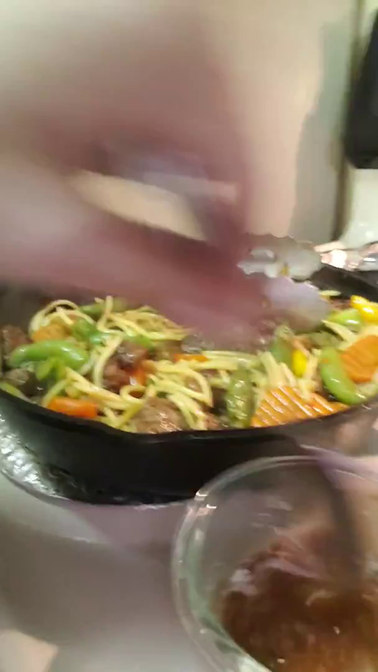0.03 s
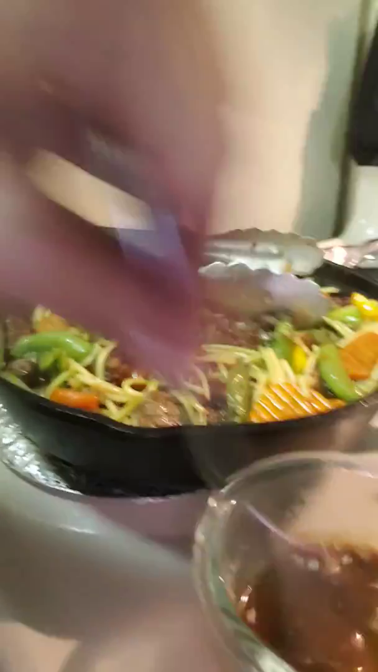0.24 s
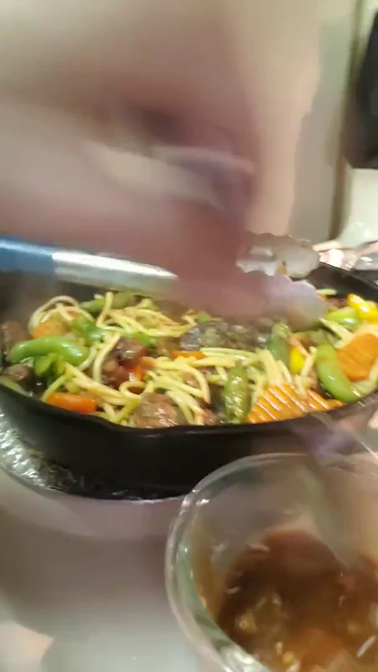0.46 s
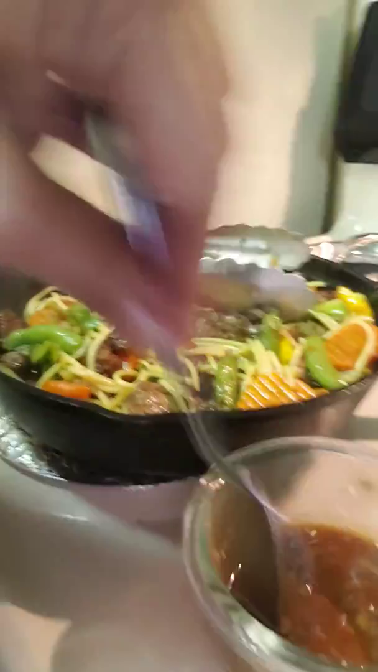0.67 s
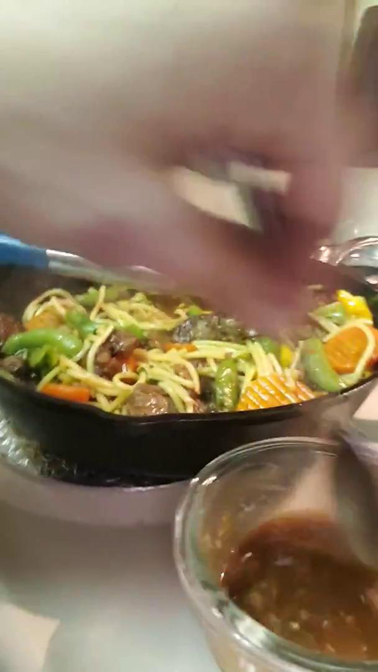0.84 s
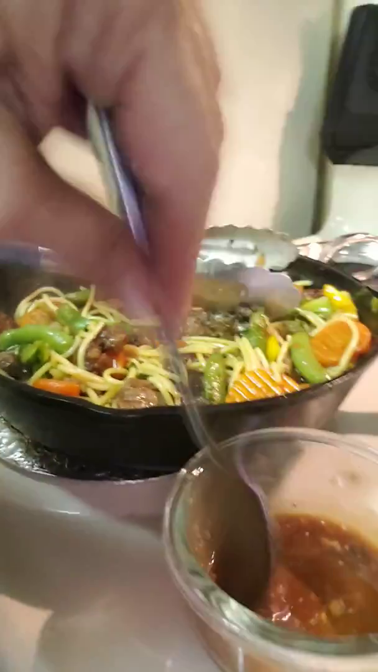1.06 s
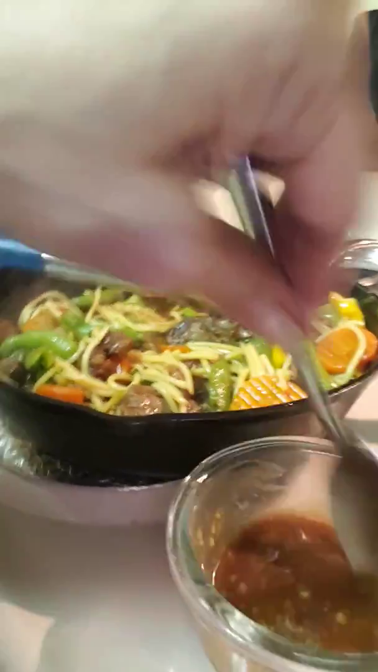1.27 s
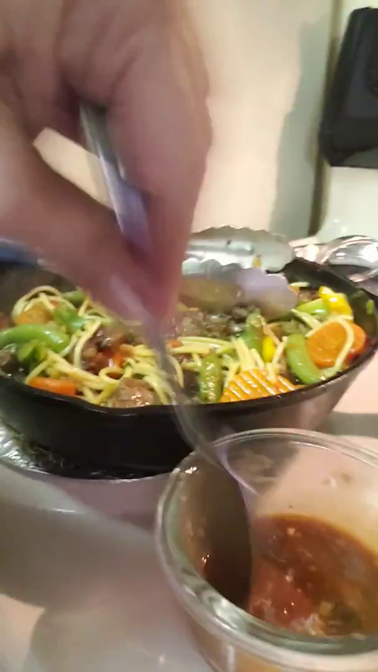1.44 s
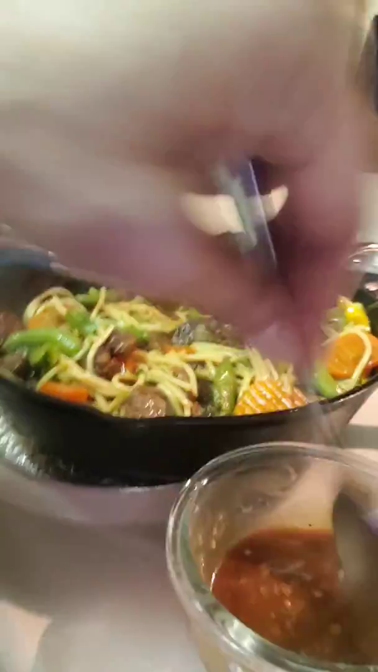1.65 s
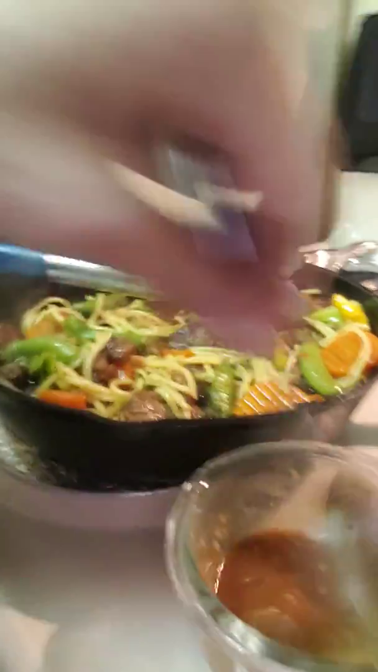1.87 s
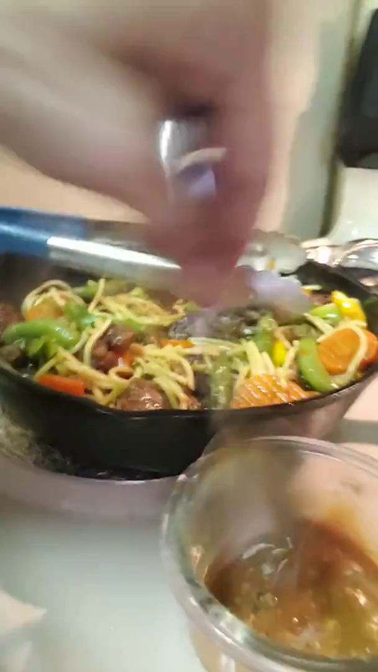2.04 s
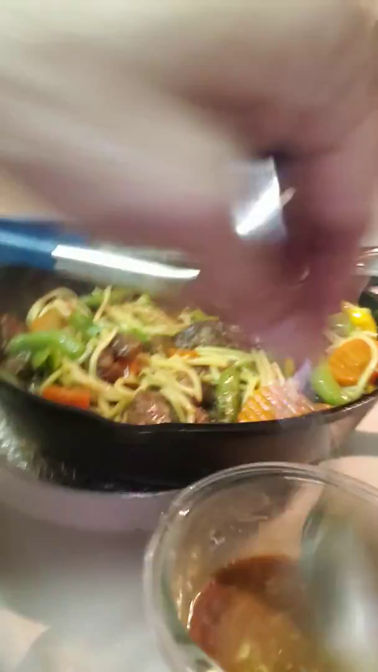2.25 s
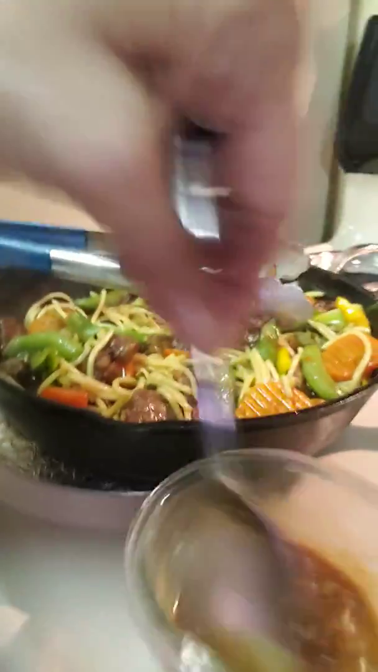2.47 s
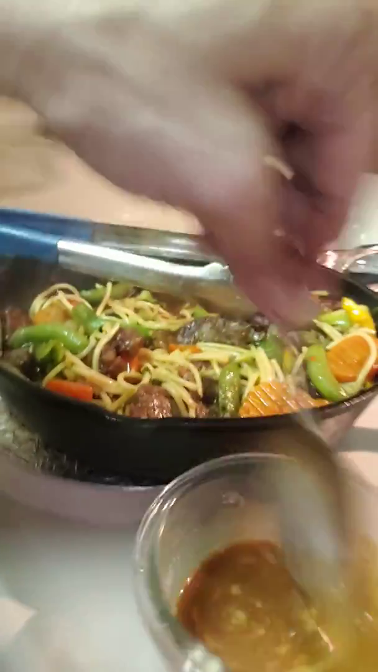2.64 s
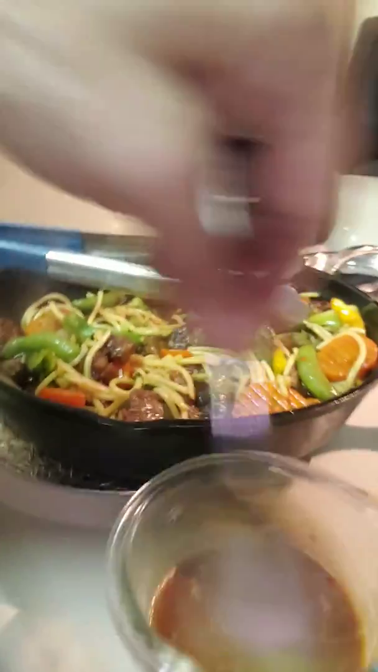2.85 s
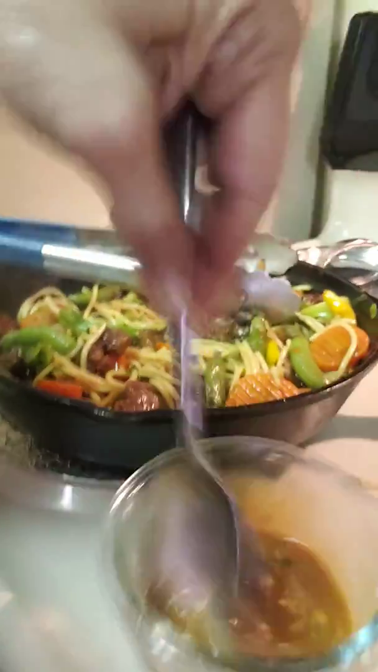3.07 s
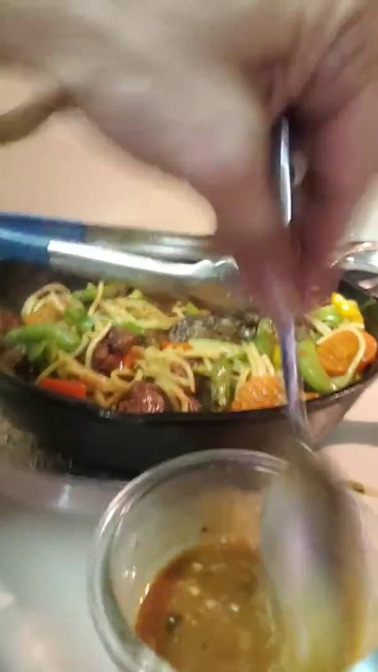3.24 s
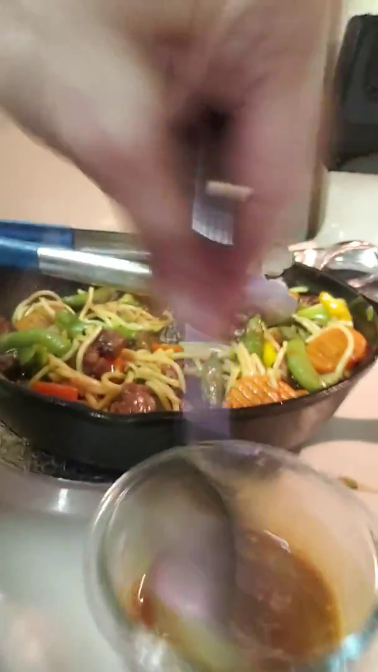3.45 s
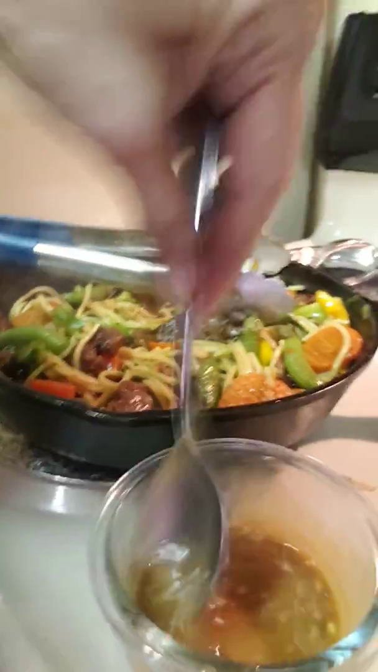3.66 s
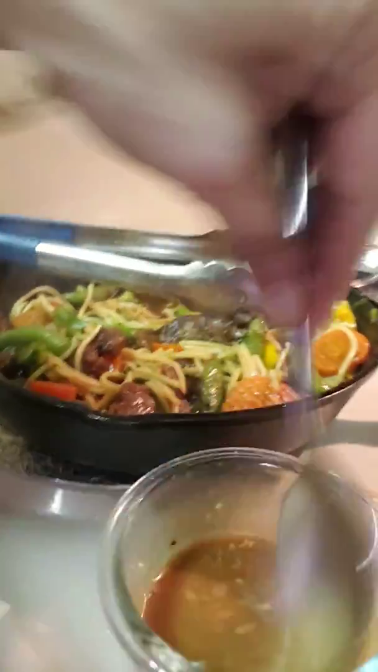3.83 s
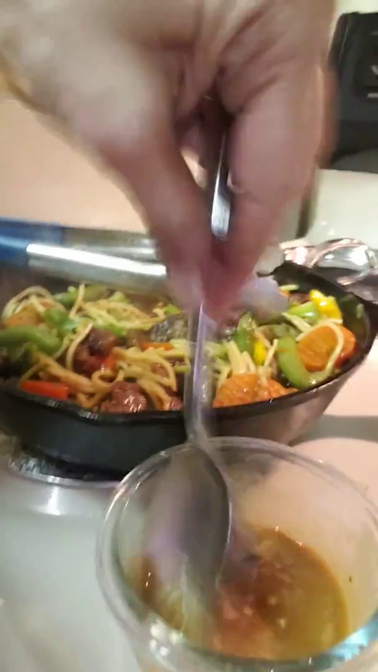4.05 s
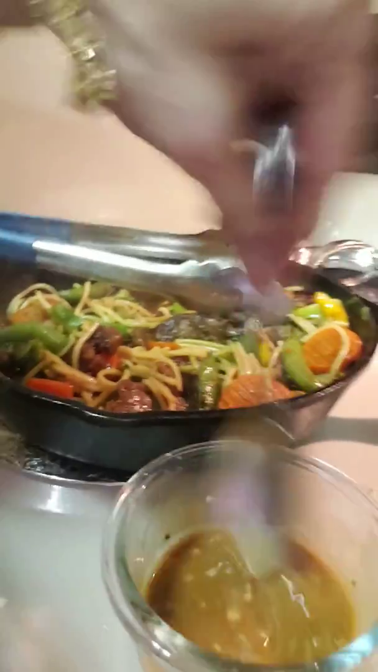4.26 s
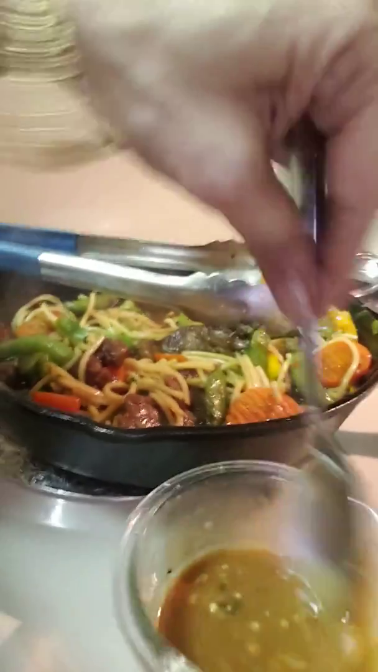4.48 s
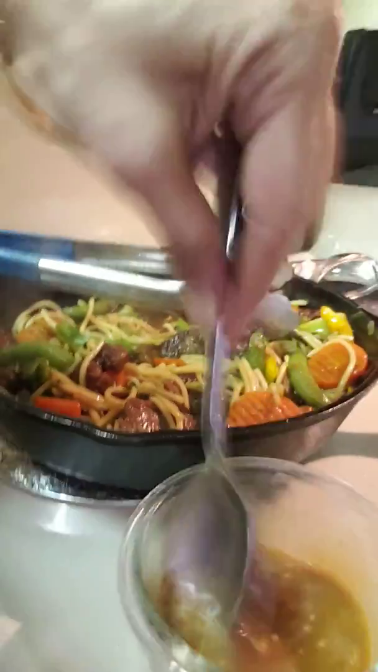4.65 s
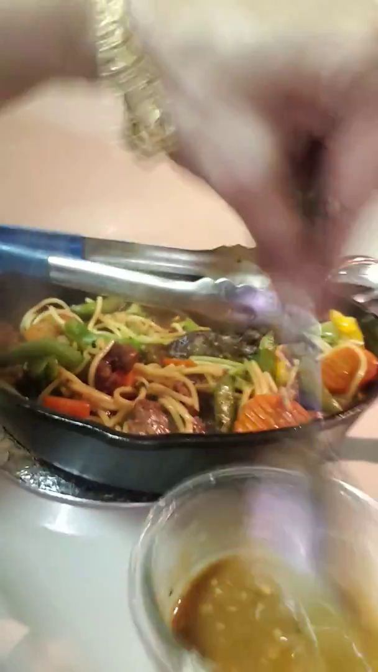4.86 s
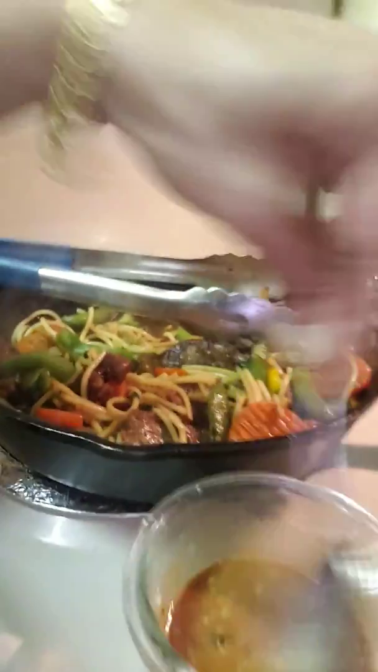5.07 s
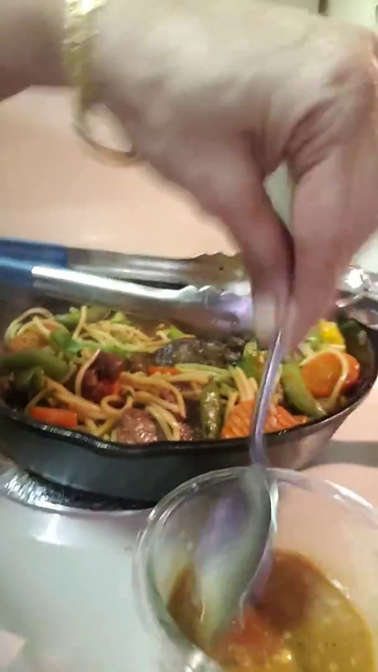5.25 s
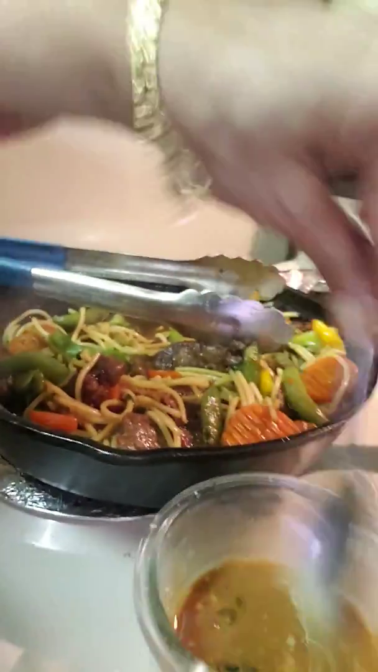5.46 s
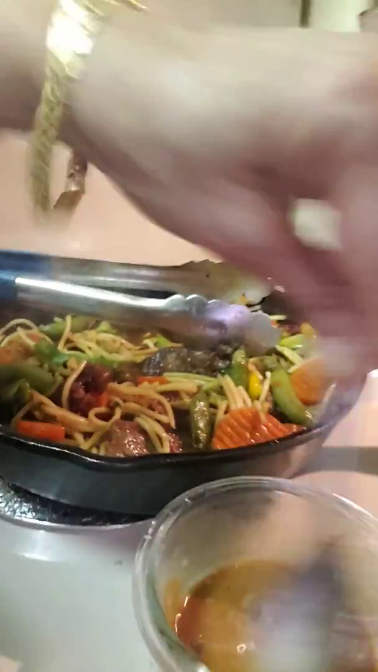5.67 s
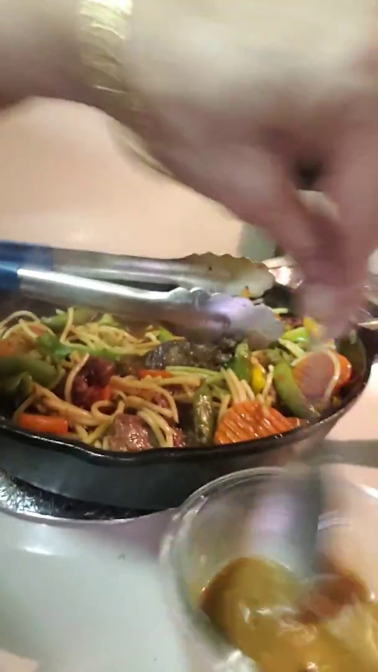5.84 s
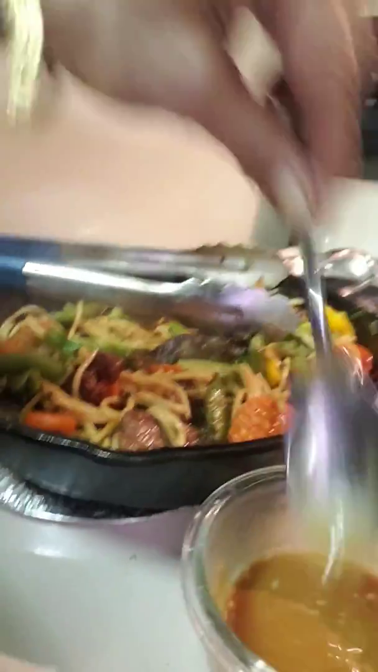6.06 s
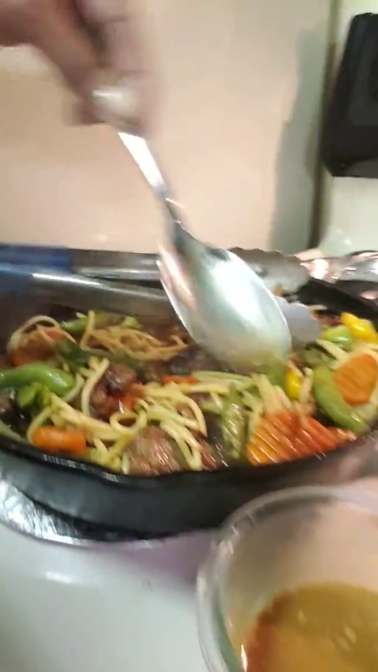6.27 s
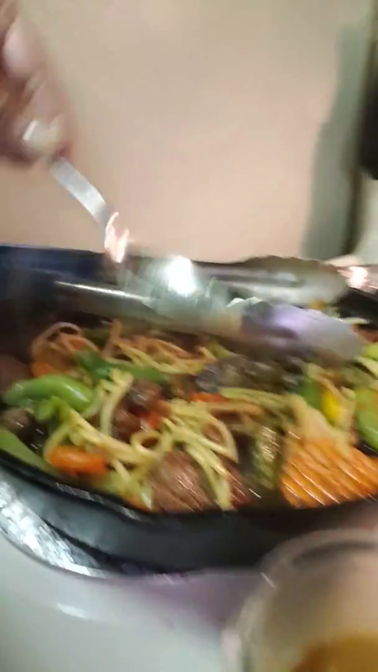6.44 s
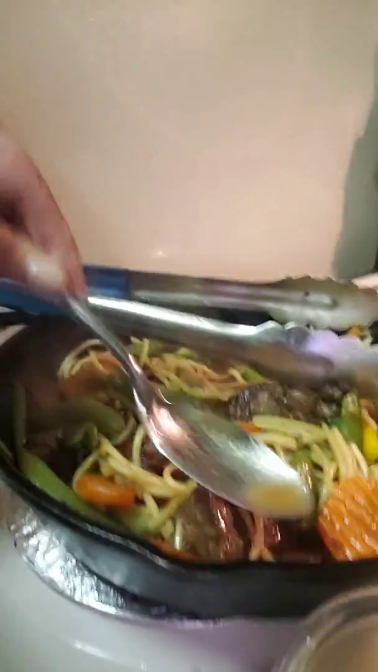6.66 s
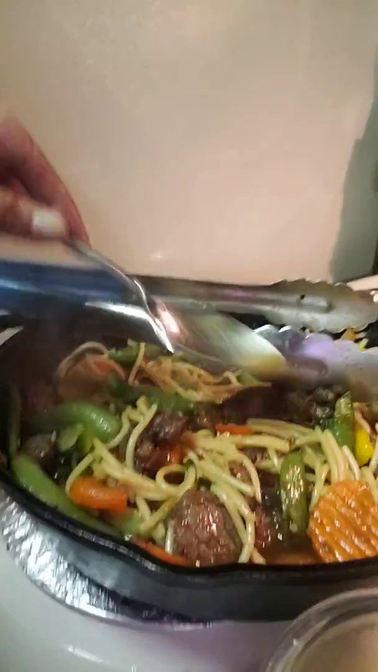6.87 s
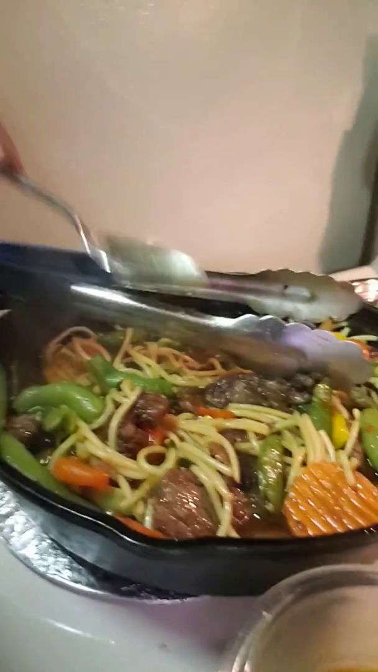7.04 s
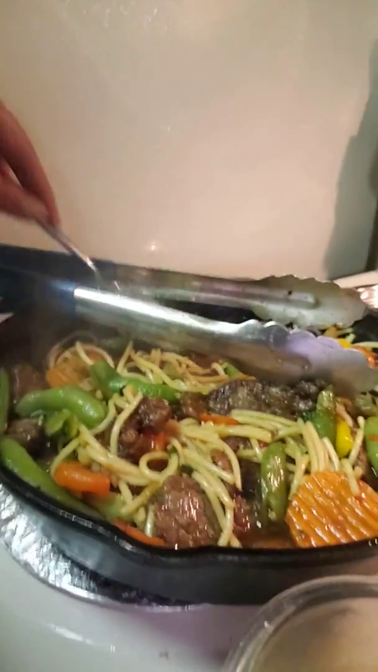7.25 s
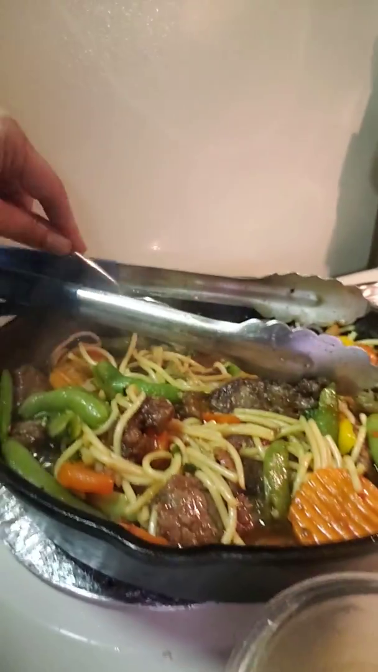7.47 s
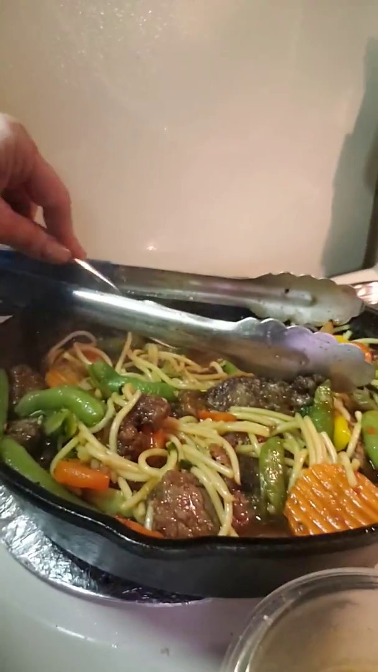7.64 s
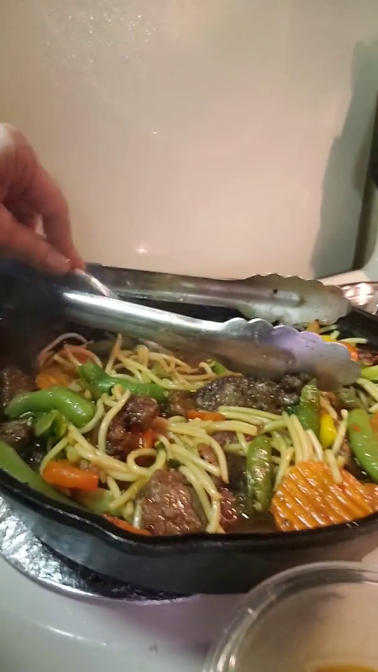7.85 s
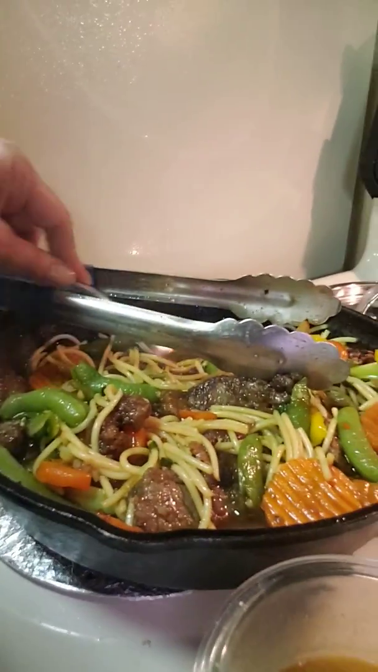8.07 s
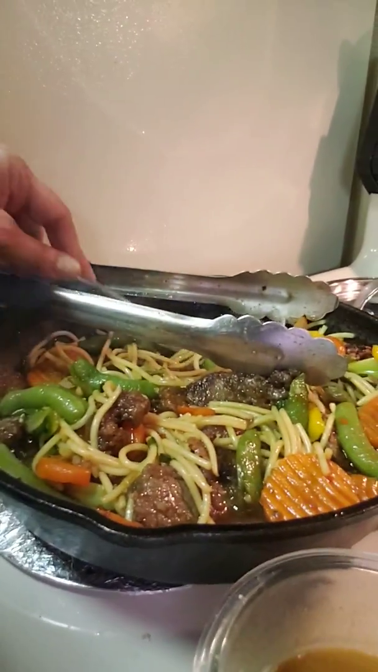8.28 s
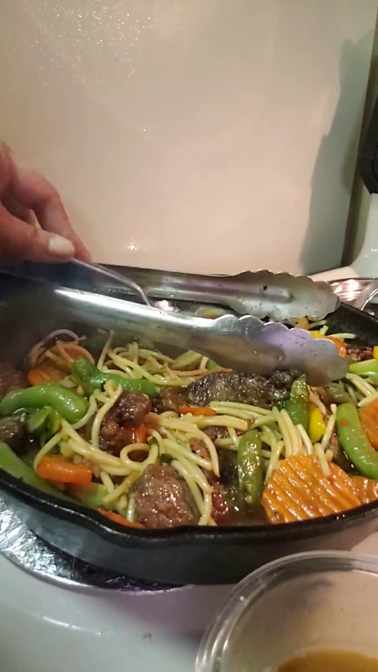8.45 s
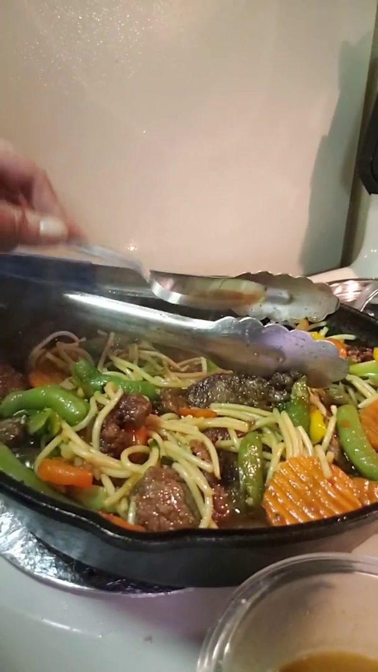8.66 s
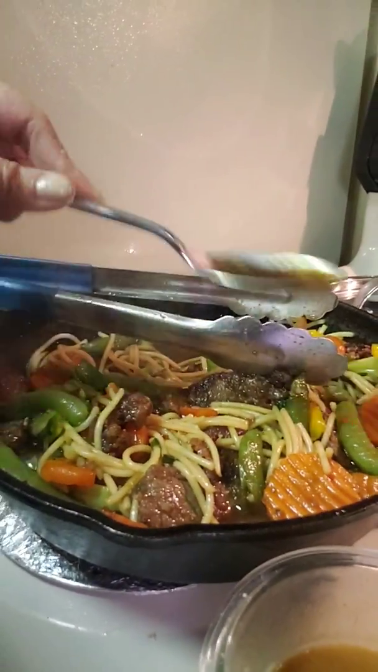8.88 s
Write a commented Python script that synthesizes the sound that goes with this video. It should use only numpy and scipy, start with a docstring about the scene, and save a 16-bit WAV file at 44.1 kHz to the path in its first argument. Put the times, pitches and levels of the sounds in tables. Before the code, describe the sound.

A metal spoon stirs sauce briskly in a small glass bowl, close to the microphone, with a short kitchen echo. From the start until about 5.8 seconds it strikes the glass unevenly, around nine times a second, mixing light ticks and clacks with bright, briefly ringing clinks and dull knocks of the bowl on the counter. Underneath, thick sauce churns and squelches softly, more so from about 2.5 seconds, with a few small plops. The stirring stops, leaving a second of quiet background. At 6.9 seconds the spoon clicks sharply against steel tongs, followed by softer taps and a slight slide around 7.3 to 7.4 seconds. A faint skillet sizzle and a fan's low hum run throughout and swell gradually from about 7.5 seconds to the end, near 9 seconds. Several tiny spits come from the hot pan between 7.9 and 8.4 seconds.

```python
"""A metal spoon stirs sauce briskly in a small glass bowl on a kitchen counter, close up. Each blow ticks,
clacks, rings the glass and knocks the bowl on the counter; the kitchen echoes. The sauce churns and its air
pockets plop. Then the spoon clicks against steel tongs on a skillet. A faint sizzle and a fan's low hum run
throughout; the whole background swells at the end."""
import sys
import numpy as np
from scipy import signal
from scipy.fft import rfft, irfft
from scipy.io import wavfile
from scipy.ndimage import uniform_filter1d

SR = 44100
rng = np.random.default_rng(int(sys.argv[2]) if len(sys.argv) > 2 else 0)


def bounce(signal):
    """Save signal as a 16-bit WAV file at the path given by the first command-line argument."""
    frames = np.transpose(np.atleast_2d(signal))
    limited = np.clip(frames, -1, 1)
    pcm = np.round(limited * 32767).astype(np.int16)
    wavfile.write(sys.argv[1], SR, pcm)


N = 392928
BLOW_SAMPLES, HEAD_SAMPLES = 20000, 1102
TIME_S, AGE_S = np.arange(N) / SR, np.arange(BLOW_SAMPLES) / SR

# spoon on glass
# (time [s], knock [dB], clack [dB], low ring [dB], main ring [dB], length [s], tick tilt [dB])
BLOWS = [(.002, -52, -45.5, -36.5, -24.5, 0.016, 1.5), (.211, -48.5, -49.5, -43.5, -40.5, 0.0073, 7),
         (.3183, -44, -30, -23.5, -15, 0.017, 2.5), (.37, -33, -40, -34.5, -46, 0.011, 1),
         (0.5107, -35.5, -38.5, -58, -54, 0.0057, 3.5), (.607, -71, -70, -65, -60, 0.007, 5),
         (.634, -37.5, -34, -27.5, -25.5, 0.011, -4.5), (0.7163, -51.5, -33.5, -25.5, -24, 0.0061, -2),
         (0.804, -46.5, -64.5, -67.5, -80, 0.0084, -1.5), (.857, -47, -56.5, -52, -96, 0.0096, 0),
         (0.883, -46.5, -49.5, -47, -65, 0.013, -2), (0.9692, -51.5, -48, -42.5, -36.5, 0.0083, 0.5),
         (1.1121, -45, -31.5, -17.5, -10.5, .011, 0.5), (1.205, -33.5, -33.5, -39, -56, 0.0066, -2),
         (1.3522, -44.5, -49.5, -44, -35.5, 0.0087, -0.5), (1.46, -42, -32, -25, -20, 0.007, -1),
         (1.5673, -36, -41.5, -42, -41, 0.0048, 0), (1.7104, -37.5, -41.5, -37.5, -30, 0.0096, 3),
         (1.9697, -39, -42, -49, -44, 0.007, -3.5), (2.0197, -30, -22, -21.5, -18, .011, 2),
         (2.1369, -33, -28, -33, -25.5, 0.0071, -4), (2.2644, -41, -40.5, -38.5, -42, 0.0057, 0),
         (2.3654, -32, -25, -19.5, -16, 0.019, 2.5), (2.462, -37.5, -40, -33, -37, 0.015, -2.5),
         (2.5901, -38.5, -33.5, -34.5, -36.5, 0.01, -1.5), (2.6621, -33, -31.5, -31.5, -27.5, 0.0039, 0),
         (2.737, -33.5, -39, -35.5, -49, 0.012, -3.5), (2.8223, -53, -44.5, -44.5, -61, 0.008, -3),
         (2.92, -48.5, -40, -32.5, -41, 0.011, -3.5), (2.9759, -36, -31.5, -32.5, -27.5, 0.0091, 1.5),
         (3.038, -32.5, -37.5, -34, -42, 0.0094, -1.5), (3.1101, -35, -31.5, -30, -26.5, 0.0088, 3),
         (3.286, -34, -22, -31, -18.5, .011, -0.5), (3.3528, -26, -28, -33, -31, 0.013, -3),
         (3.6077, -37.5, -22, -27, -15.5, 0.016, -1), (3.643, -27.5, -33, -26.5, -20, 0.014, 2),
         (3.665, -38.5, -28.5, -25, -23.5, 0.013, 1.5), (3.722, -40.5, -41, -45, -44.5, 0.0066, 0),
         (3.9224, -37, -25.5, -27.5, -14.5, .012, -1.5), (3.9694, -33, -31.5, -28, -33, 0.017, -1.5),
         (4.2744, -35, -31.5, -30.5, -19.5, 0.0099, 4.5), (4.295, -38, -31, -26, -27, 0.019, 2.5),
         (4.3547, -36, -29.5, -36.5, -35, 0.0069, -4), (4.517, -39, -33.5, -44, -59, 0.011, -3),
         (4.666, -46, -63.5, -60, -68, 0.015, 0.5), (4.8755, -34.5, -27.5, -29, -13.5, 0.019, -2),
         (4.905, -28.5, -33.5, -38, -28, .013, -1), (4.9754, -62, -28.5, -29.5, -22, 0.011, -3),
         (5.07, -42, -45, -35.5, -47, 0.0073, 0.5), (5.1614, -32.5, -26, -31, -12.5, 0.018, -0.5),
         (5.2867, -36.5, -36, -37, -41, 0.01, 3.5), (5.513, -34, -27, -24, -12.5, 0.019, -2),
         (5.7515, -47.5, -48.5, -39.5, -48.5, 0.0068, -0.5), (5.8023, -38, -22, -28, -14, 0.0089, -4)]
# bending modes, split in close pairs (frequency [Hz], level [dB], free t60 [s], ring [0 low/1 main/2 top])
GLASS_MODES = [(2411, 0, .22, 0), (2450, -4, .14, 0), (2545, -14, .1, 0), (5845, -3, .16, 1),
               (5916, 0, .28, 1), (6050, -13, .1, 1), (7390, -17, .2, 1), (10315, -2, .22, 2),
               (10375, 0, .26, 2), (10440, -8, .16, 2), (11375, -17, .2, 2), (14853, -17, .2, 2)]
# bowl balance as the hand-held microphone drifts (time [s], left minus right [dB])
BOWL_PAN_DB = [(1.2, -3.5), (1.7, -3), (4.9, -3.5), (5.8, -4.5)]
# resonances (frequency [Hz], width [Hz], height over the broad spectrum [dB])
BOWL_MODES = [(344, 22, 5), (420, 24, 8), (505, 20, 8), (760, 50, 2), (1256, 40, 10.5), (1400, 40, 4),
              (1667, 16, 14), (1840, 16, 6), (1955, 16, 12)]
SPOON_MODES = [(2845, 45, 8), (3237, 24, 10.5), (3830, 90, 6), (3966, 70, 12), (4130, 70, 5), (4310, 60, 4),
               (7450, 200, 4)]
TONG_MODES = [(1830, 18, 19), (2880, 30, 9), (3240, 30, 9), (4950, 200, 10), (7250, 100, 9)]
# how hard the spoon digs into the sauce (time [s], gain [dB])
DIGGING_DB = [(0, -57), (1.8, -74.5), (2.6, -50.5), (4.1, -60), (5.9, -51.5), (6.2, -74)]
# air pockets in the sauce (time [s], start frequency [Hz], level [dB])
AIR_POCKETS = [(.884, 564, -47), (3.434, 500, -46.5), (3.734, 424, -44), (4.35, 421, -37),
               (4.67, 509, -52.5), (5.225, 480, -47)]
# spoon on tongs (time [s], clang [dB], tick [dB], rise [s], length [s], freedom to ring [0-1])
TONG_BLOWS = [(6.9101, -46, -27.5, 0.00033, 0.0067, 0.56), (7.2933, -55, -40.5, 0.00043, 0.009, 0.34),
              (7.324, -58, -50, .005, 0.018, 0.6), (7.347, -53, -57, 0.0045, 0.014, 0.8),
              (7.417, -55, -60, 0.0086, 0.0088, 1), (7.9, -65, -70, .01, 0.015, .6)]
# sauce spitting on hot iron (time [s], level [dB])
SPIT_EVENTS = [(7.9422, -49.5), (8.0524, -45.5), (8.0947, -47.5), (8.1468, -50.5), (8.2847, -48.5),
               (8.4248, -48)]
# fan hum (frequency [Hz], relative level [dB])
HUM_LINES = [(59.5, -57), (145, -60.5), (290.7, -69.5), (349.9, -68.5)]
# broad spectra (frequency [Hz], gain [dB])
TICK_EQ = [(500, -27), (2500, -19), (5000, -8.5), (7400, -2.5), (8400, -16.5), (9500, -17.5), (10500, -3.5),
           (11600, 1), (13200, -1), (14000, -6), (15200, -5.5), (16200, -18)]
CLACK_EQ = [(500, -25.5), (1800, -8.5), (2700, 2.5), (3500, 1), (4900, -7.5), (6300, -3.5), (7500, -16),
            (8500, -25.5), (12000, -34)]
KNOCK_EQ = [(60, -20.5), (200, -1), (400, -1), (900, 1), (1500, -2.5), (2200, -11.5), (3000, -5.5),
            (6000, -41)]
THUD_EQ = [(20, -24.5), (45, -15.5), (66, 9), (95, 0), (140, 0.5), (220, -3.5), (330, -12.5), (600, -32),
           (2000, -73.5)]
CHURN_EQ = [(30, -17.5), (70, -2), (150, 9.5), (450, -2), (900, -16.5), (2000, -25.5), (6000, -32)]
SQUELCH_EQ = [(150, -13.5), (500, 0), (1300, -8.5), (3500, -8), (9000, -33)]
CLANG_EQ = [(100, -29.5), (600, 2), (1200, 2.5), (5000, -1.5), (7500, -7.5), (9000, -21.5), (16000, -12)]
TONG_TICK_EQ = [(3000, -18.5), (9500, -14), (10500, -7), (12500, 1), (13600, -2), (15000, -6),
                (16200, -19.5)]
SIZZLE_EQ = [(500, -25.5), (1800, -7.5), (4500, -7), (7500, -4.5), (8500, -19.5), (10000, -8), (12000, 4),
             (14000, 1), (15400, -4), (16200, -25.5)]
SPIT_EQ = [(800, -8.5), (3000, -15.5), (7500, -4.5), (8500, -19), (12000, 7), (15200, -4), (16200, -22)]
FAN_EQ = [(20, -11.5), (45, -6), (60, 5), (85, 1.5), (110, -2.5), (145, 2), (200, -8), (350, -6.5),
          (700, -13), (1100, -21), (2000, -37.5), (6000, -41)]
# kitchen decay (frequency [Hz], t60 [s])
ROOM_T60_S = [(100, 0.5), (400, 0.44), (1500, 0.2), (5000, 0.37), (10000, .29), (16000, 0.24)]


def stirring(knock_pan_db=-2.5):
    """Spoon strikes glass: tick, clack, three rings, and a knock that thuds into the counter."""
    out = np.zeros((2, N))
    rooms = [kitchen() for _ in range(8)]
    for k, (time_s, knock_db, clack_db, low_db, main_db, length_s, tick_tilt_db) in enumerate(BLOWS):
        room = rooms[k % len(rooms)]
        tick_db, top_db = brightness_db(clack_db, main_db, length_s, tick_tilt_db)
        drag_s = length_s * (.55 + (length_s / .02) ** 2)  # long blows drag along the wall
        tick = colour(contact(drag_s, rise_s=.0002, coherence=.22), TICK_EQ)
        clack = colour(contact(drag_s, rise_s=.00015, coherence=.56), CLACK_EQ, SPOON_MODES)
        knock = colour(contact(1.27 * drag_s, rise_s=.001, coherence=.65), KNOCK_EQ, BOWL_MODES)
        low = glass_ring(0, length_s, choked_db=-17, free_ratio=1.4)
        main = glass_ring(1, length_s, choked_db=-22.5, free_ratio=1.15)
        top = glass_ring(2, length_s, choked_db=-21.5, free_ratio=1.4)
        blow = in_room(tick, room, tick_db, wet_db=-10)
        blow += in_room(clack, room, clack_db - .5, wet_db=-12)
        blow += in_room(knock, room, knock_db - 1, wet_db=-3.5) * pan(knock_pan_db)
        blow += in_room(low, room, low_db, wet_db=-4)
        blow += in_room(main, room, main_db, wet_db=-12.5)
        blow += in_room(top, room, top_db, wet_db=-11)
        blow = delay_left(blow) * pan(np.interp(time_s, *np.transpose(BOWL_PAN_DB)))
        thud = colour(contact(.048, rise_s=.0019, coherence=.96), THUD_EQ)
        add(out, time_s, blow + amp(knock_db - 17.5) * unit_rms(thud))
    return out


def glass_ring(ring, length_s, choked_db, free_ratio, scatter_rad=.94):
    """The glass rings freely for a moment, then the spoon leans on it and chokes it."""
    free_s = free_ratio * max(length_s, .003)
    choke = amp(choked_db) + 1 / (1 + (AGE_S / free_s) ** 6)
    detune = 1 + .001 * rng.standard_normal()  # moving sauce detunes the glass
    out = np.zeros((2, BLOW_SAMPLES))
    for hz, db, t60_s, mode_ring in GLASS_MODES:
        if mode_ring == ring:
            phase_rad = 2 * np.pi * (hz * detune * AGE_S + rng.random())
            stereo_rad = scatter_rad * rng.standard_normal((2, 1))
            out += amp(db - 60 * AGE_S / t60_s) * np.sin(phase_rad + stereo_rad)
    return out * choke * attack(.00019)


def brightness_db(clack_db, main_db, length_s, tick_tilt_db, mid_db=-30, mid_s=.01, top_db_per_s=648.5):
    """Louder blows tick more, longer ones feed the top ring; tilt trades top ring for tick."""
    clack_over_db, main_over_db = clack_db - mid_db, main_db - mid_db
    tick_db = -30.5 + .46 * clack_over_db + .33 * main_over_db + tick_tilt_db
    top_db = -38 + .92 * main_over_db + top_db_per_s * (length_s - mid_s) - tick_tilt_db
    return tick_db, top_db


def contact(decay_s, rise_s, coherence, rough_db=3):
    """Contact force: a dying rush of tiny impacts."""
    grain = unit_rms(uniform_filter1d(rng.standard_normal(BLOW_SAMPLES), size=40))
    envelope = attack(rise_s) * np.exp(-AGE_S / max(decay_s, .001))
    return noise(BLOW_SAMPLES, coherence) * amp(rough_db * grain) * envelope


def sauce(churn_db=.5, squelch_db=-9, burst_s=.0033, crest_s=.085):
    """Thick sauce churns and squelches; each blow pushes a wave that crests and settles."""
    churn = unit_rms(colour(noise(N, .99), CHURN_EQ))
    bursts = signal.lfilter([1], [1, -np.exp(-1 / (burst_s * SR))], pops(rate_hz=45, spread_db=5.2))
    squelch = unit_rms(colour(noise(N, .75) * bursts, SQUELCH_EQ, BOWL_MODES))
    ages = (np.maximum(TIME_S - time_s, 0) / crest_s for time_s, *_ in BLOWS)
    waves = np.sqrt(sum((age * np.exp(1 - age)) ** 2 for age in ages))  # powers add
    digging = amp(np.interp(TIME_S, *np.transpose(DIGGING_DB)))
    return digging * waves * (amp(churn_db) * churn + amp(squelch_db) * squelch) * pan(-2.5)


def plops(glide_per_s=.85, t60_s=.11):
    """Air pockets close in the sauce and ring, rising slightly in pitch."""
    out = np.zeros((2, N))
    for time_s, hz, db in AIR_POCKETS:
        tone = np.sin(2 * np.pi * hz * AGE_S * (1 + glide_per_s * AGE_S))
        bubble = tone * amp(-60 * AGE_S / t60_s) * attack(.0039)
        add(out, time_s, in_room(bubble * pan(-1.8), kitchen(), db, wet_db=-5.5))
    return out


def tongs():
    """The spoon taps and slides on steel tongs: a clang and a bright tick."""
    out = np.zeros((2, N))
    for time_s, clang_db, tick_db, rise_s, length_s, freedom in TONG_BLOWS:
        room = kitchen()
        modes = [(hz, width_hz, freedom * db) for hz, width_hz, db in TONG_MODES]
        drag_s = length_s * (.83 + (length_s / .014) ** 2)
        clang = colour(contact(drag_s, rise_s, coherence=.59), CLANG_EQ, modes)
        tick = colour(contact(drag_s, rise_s, coherence=.23), TONG_TICK_EQ)
        blow = in_room(clang, room, clang_db + 2, wet_db=-2)
        blow += in_room(tick, room, tick_db - 1, wet_db=-8.5)
        add(out, time_s, blow * pan(-4))
    return out


def skillet(crackle_db=-67, hiss_db=-64):
    """Tiny bubbles burst on hot iron: a faint fizz and a few louder spits."""
    bubbles = pops(rate_hz=700, spread_db=2.9) * noise(N, .68)
    crackle = amp(crackle_db) * unit_rms(colour(bubbles, SIZZLE_EQ))
    hiss = amp(hiss_db) * unit_rms(colour(noise(N, .061), SIZZLE_EQ))
    out = (crackle + hiss) * swell() * pan(-2.7)
    room = kitchen()
    for time_s, db in SPIT_EVENTS:
        spit = colour(contact(.0096, rise_s=.0002, coherence=.26), SPIT_EQ)
        add(out, time_s, in_room(spit, room, db, wet_db=-15) * pan(-9.5))
    return out


def fan(gain_db=-2.5, rush_db=-55, waver_rad=.94):
    """Kitchen fan: a low rush of air and wavering hum lines."""
    knots_s = np.linspace(0, TIME_S[-1], num=45)
    hum = np.zeros(N)
    for hz, db in HUM_LINES:
        drift_rad = np.interp(TIME_S, knots_s, waver_rad * rng.standard_normal(len(knots_s)))
        hum += amp(db) * np.sqrt(2) * np.sin(2 * np.pi * hz * TIME_S + drift_rad)
    rush = amp(rush_db) * unit_rms(colour(noise(N, .78), FAN_EQ))
    return amp(gain_db) * swell() * (rush + hum) * pan(-1.5)


def swell(start_s=7.56, db_per_s=7):
    """Fan and sizzle gain: flat, then rising."""
    return amp(db_per_s * np.maximum(TIME_S - start_s, 0))


def kitchen(coherent_below_hz=600, build_s=.00078):
    """Frequency response of one random pattern of dense echoes; the bass lasts longest."""
    hz, age_s, (left, other) = signal.stft(noise(BLOW_SAMPLES, 0), SR, nperseg=256)
    coherence = np.exp(-(hz / coherent_below_hz) ** 2)[:, None]
    decay = amp(-60 * age_s / at_hz(ROOM_T60_S, hz)[:, None])
    _, tail = signal.istft(stereo(left, other, coherence) * decay, SR, nperseg=256)
    tail = tail[:, :BLOW_SAMPLES] * (1 - np.exp(-(AGE_S / build_s) ** 2))
    return rfft(tail / np.linalg.norm(tail[0]), 2 * BLOW_SAMPLES)


def in_room(x, room, level_db, wet_db):
    """Adds echoes, then sets the rms of the first 25 ms."""
    echoes = irfft(rfft(x, 2 * BLOW_SAMPLES) * room)[:, :BLOW_SAMPLES]
    x = x + amp(wet_db) * echoes
    return amp(level_db) * x / np.sqrt(np.mean(x[:, :HEAD_SAMPLES] ** 2) + 1e-20)


def colour(x, eq, modes=(), fft_size=4096):
    """Minimum-phase filter: resonances on a broad spectrum."""
    hz = abs(np.fft.fftfreq(fft_size, 1 / SR))
    peaks = sum(amp(2 * db) / (1 + (2 * (hz - mode_hz) / width_hz) ** 2)
                for mode_hz, width_hz, db in modes)
    log_gain = np.log(amp(at_hz(eq, hz)) * np.sqrt(1 + peaks))
    response = np.exp(signal.hilbert(log_gain).conj())
    taps = np.fft.ifft(response).real[:fft_size // 2]
    return signal.fftconvolve(x, taps[None], axes=1)[:, :x.shape[1]]


def pops(rate_hz, spread_db):
    """Random impulses of uneven strength."""
    return (rng.random(N) < rate_hz / SR) * amp(spread_db * np.minimum(rng.exponential(1, N), 4))


def noise(samples, coherence):
    return stereo(*rng.standard_normal((2, samples)), coherence)


def stereo(left, other, coherence):
    """Two independent noises to a partly alike pair."""
    return np.array([left, coherence * left + np.sqrt(1 - coherence ** 2) * other])


def delay_left(x, samples=3):
    """Sound from the right reaches the left microphone late."""
    return np.array([np.pad(x[0], (samples, 0))[:x.shape[1]], x[1]])


def pan(left_minus_right_db):
    return unit_rms(amp([[left_minus_right_db / 2], [-left_minus_right_db / 2]]))


def attack(rise_s):
    return 1 - np.exp(-AGE_S / rise_s)


def at_hz(table, hz):
    knots_hz, values = np.transpose(table)
    return np.interp(np.log(hz + 1), np.log(knots_hz), values)


def add(mix, time_s, sound):
    part = mix[:, max(round(time_s * SR), 0):][:, :sound.shape[1]]
    part += sound[:, :part.shape[1]]


def amp(db):
    return 10 ** (np.asarray(db) / 20)


def unit_rms(x):
    return x / np.sqrt(np.mean(x ** 2) + 1e-20)


def scene():
    """Bowl, skillet and fan in stereo."""
    return stirring() + sauce() + plops() + tongs() + skillet() + fan()


def record(dry):
    """Soft clip, then a 16 kHz low-pass."""
    rounded = dry / (1 + dry ** 6) ** (1 / 6)
    lowpass = signal.firwin(255, 16000, window=("kaiser", 8), fs=SR)
    return signal.oaconvolve(rounded, lowpass[None], "same")


dry = scene()
out = record(dry)
bounce(out)
```